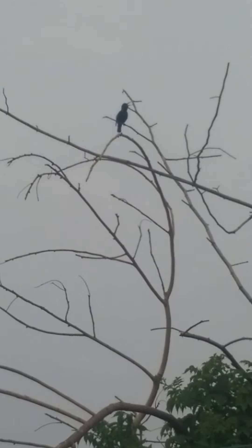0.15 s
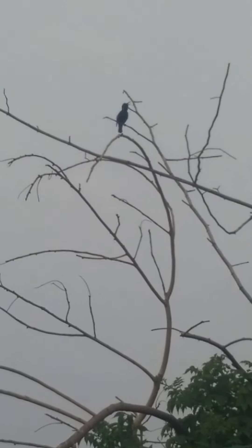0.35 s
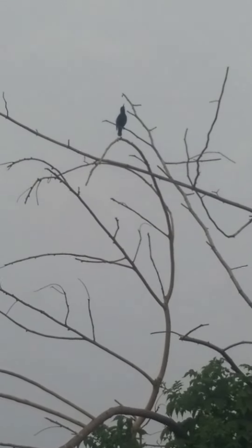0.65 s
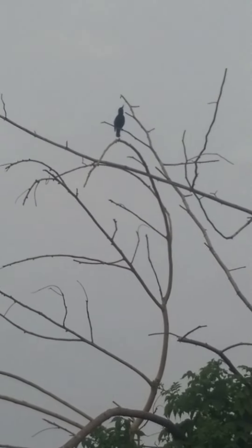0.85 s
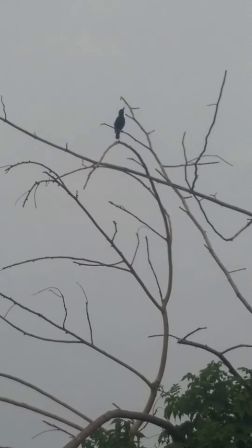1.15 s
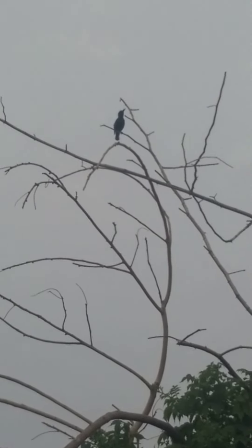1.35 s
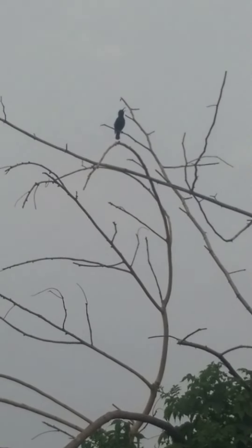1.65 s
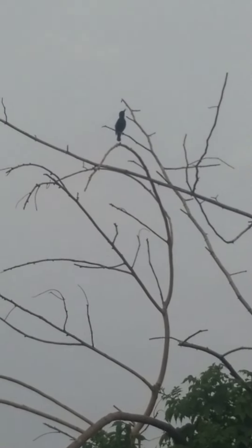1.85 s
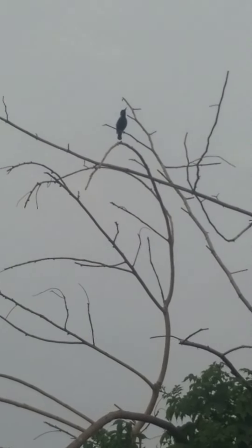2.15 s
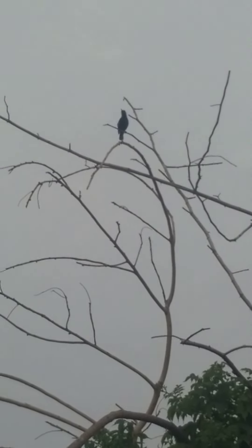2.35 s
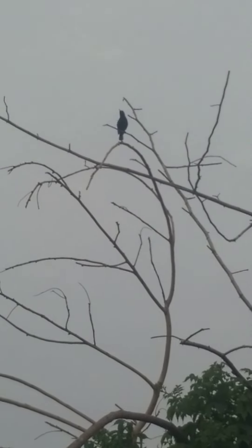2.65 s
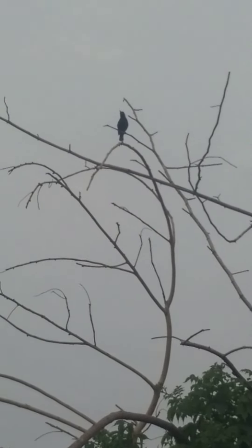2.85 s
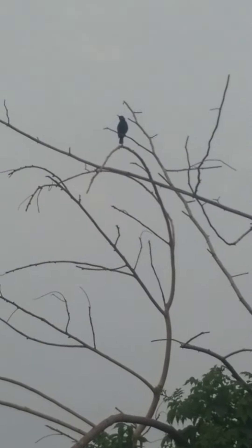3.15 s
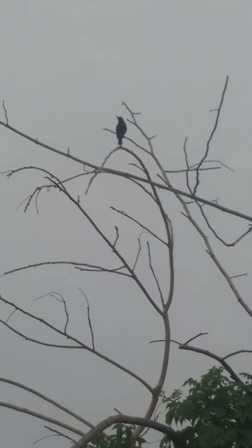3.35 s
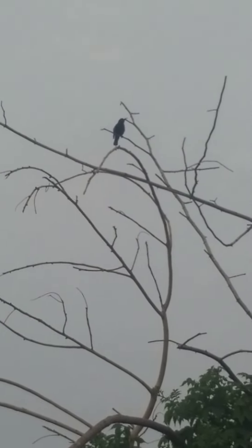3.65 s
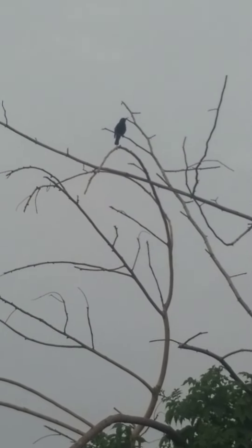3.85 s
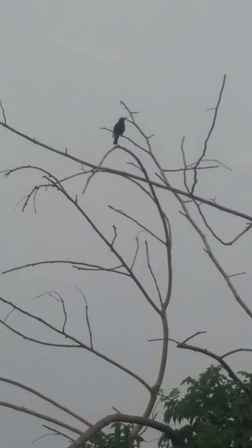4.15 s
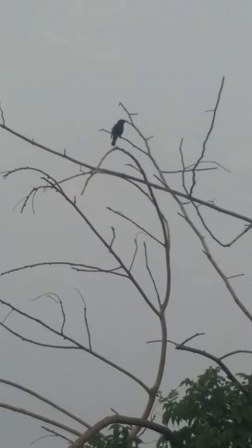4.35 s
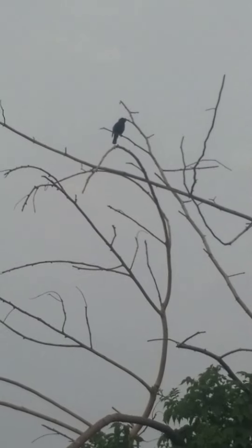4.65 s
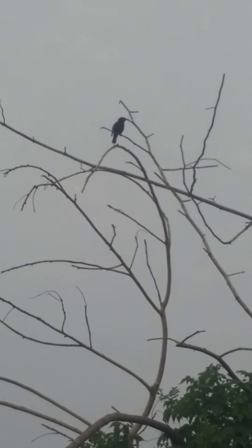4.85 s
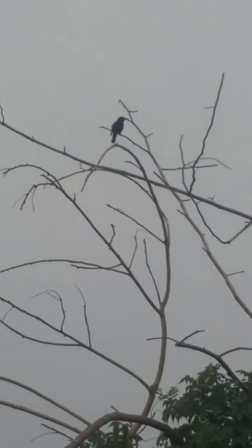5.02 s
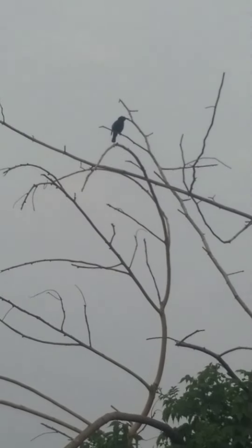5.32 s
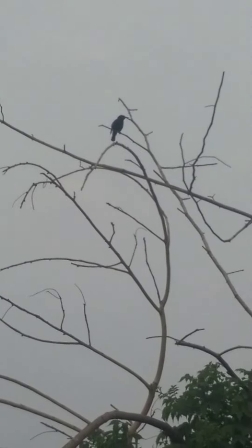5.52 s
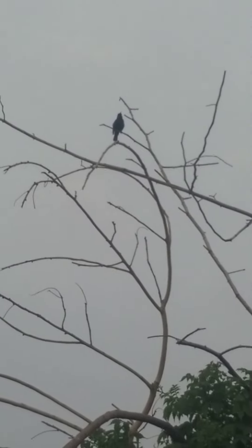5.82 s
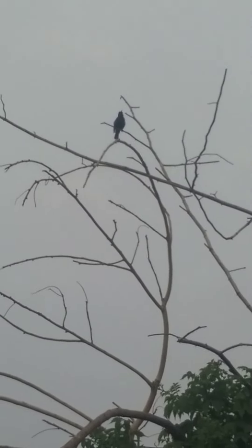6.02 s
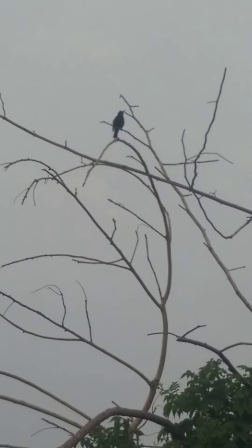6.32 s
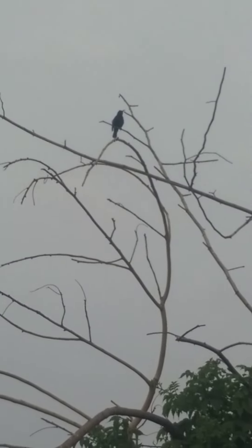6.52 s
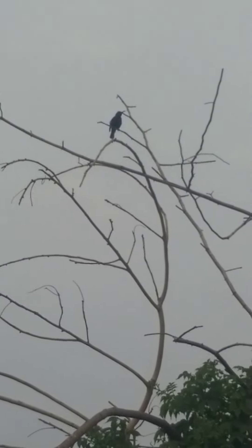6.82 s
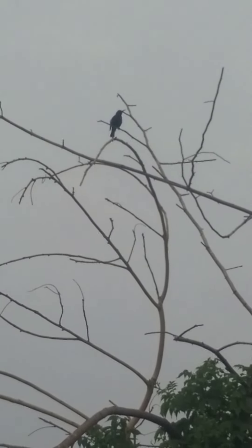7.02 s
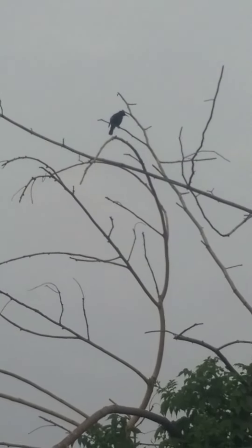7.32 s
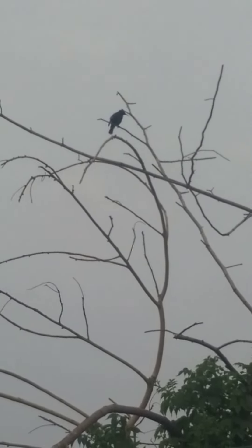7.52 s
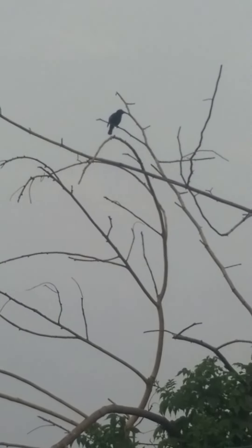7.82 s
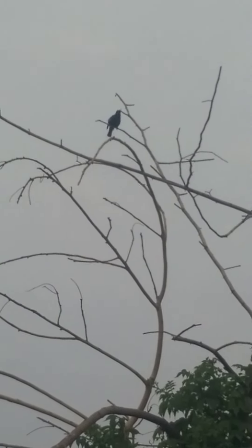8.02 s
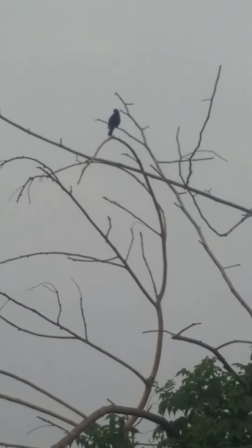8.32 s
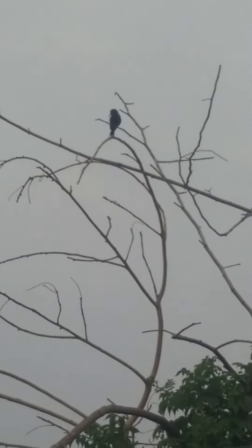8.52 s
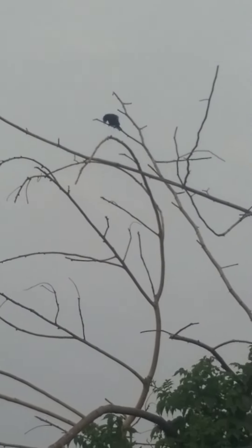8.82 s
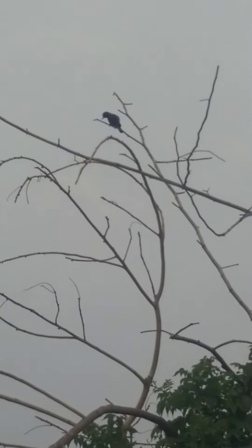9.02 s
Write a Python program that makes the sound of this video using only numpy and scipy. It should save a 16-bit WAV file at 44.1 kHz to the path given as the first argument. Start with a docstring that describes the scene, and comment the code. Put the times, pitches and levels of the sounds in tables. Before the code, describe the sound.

Outdoors, a small bird close by and to the right opens with two seconds of quick, piercing slurred whistles, its motifs speeding up. Falling calls, a dry rattle, harsh chips and faint twittering follow. A small dog farther off, near the middle, yaps at the start, around four seconds and around eight, echoing between houses. Low town murmur underlies it, with an engine rising at right near the end. Stereo pickup, open air.

```python
"""A sunbird, right of two ports, sings a run of slurred whistles, then calls, chatters and twitters softly.
Its syrinx is a swept near-sine with weak overtones; roughness adds flutter, hiss and a half-pitch tone.
A small dog nearly straight ahead yaps from further off, echoing between houses: harmonics through a throat.
Behind lie faint far birds (fluttering sines), an engine swelling at right (summed firing orders)
and the murmur of a town (coloured noise)."""
import sys
import numpy as np
from scipy import signal
from scipy.fft import rfft, irfft
from scipy.io import wavfile
from scipy.ndimage import uniform_filter1d, minimum_filter1d, map_coordinates

SR = 44100
rng = np.random.default_rng(int(sys.argv[2]) if len(sys.argv) > 2 else 0)


def wav_record(signal):
    """Record a signal, one row per channel, as 16-bit PCM in the file named by sys.argv[1]."""
    frames = np.transpose(np.atleast_2d(signal))
    bounded = np.clip(frames, -1, 1)
    # unit amplitude maps onto the largest positive 16-bit level
    quanta = np.round(bounded * 32767).astype(np.int16)
    wavfile.write(sys.argv[1], SR, quanta)


N = 404397
TIME_S = np.arange(N) / SR

# town murmur, relative colour: f/Hz, level/dB
TOWN_COLOUR = [(25, -22.5), (45, -6.5), (90, 0.5), (200, 1.5), (420, -3), (1100, -2.5), (1550, -4.5),
               (2100, -17), (3200, -12.5), (4500, -19.5), (5900, -12.5), (7000, -30), (10000, -32.5),
               (15500, -34.5)]
# town murmur, mean level: t/s, level/dB
TOWN_LEVEL = [(0, -45), (.8, -46.5), (2.0, -49.5), (2.6, -46), (4.5, -42.5), (5.8, -46.5), (7, -45),
              (9.17, -41.5)]
# engine: t/s, firing rate/Hz, level/dB (applied in full to orders from 5 up)
ENGINE = [(0, 45.34, -69), (3, 43.82, -57), (6, 44.23, -53), (7.6, 44.52, -52.5), (8.2, 43.52, -44.5),
          (8.8, 42.9, -44), (9.17, 43.95, -38.5)]
# engine orders: multiple of firing rate, gain/dB
ENGINE_ORDERS = [(2, -11), (4, -11), (5, -5.5), (6, -6.5), (8, -25), (10, -32), (11, -33.5)]
# far birds' held notes: start/s, length/s, mean f/Hz, level/dB, flutter/share of f
FAR_NOTES = [(1.924, 0.45, 2903, -53, 0.015), (2.154, 0.66, 2935, -63, 0.0088),
             (4.444, 0.3, 3674, -42, 0.075)]

# barks: start/s, length/s, first f/Hz, middle f/Hz, last f/Hz, level/dB, roughness, widest mouth/share of length
BARKS = [(0, 0.13, 729, 816, 864, -22, 0.76, 0.77), (0.408, .18, 667.6, 906, 773, -23.5, 1.57, .42),
         (1.1, 0.18, 615, 793.5, 751, -25, 0.52, 0.26), (3.983, 0.1272, 752, 799.1, 828, -17.5, 0.67, 0.66),
         (4.390, .18, 624.8, 800, 689.5, -20.5, 0.93, 0.26),
         (7.891, 0.14, 754, 809.3, 859.4, -18.5, 0.96, 0.72),
         (8.322, 0.14, 645.6, 849, 804, -16, 0.78, 0.4)]
# dog's throat, gain of the harmonics and colour of the noise: f/Hz, level/dB
THROAT = [(400, -50.5), (640, -9), (740, -2.5), (810, 3.5), (940, 1.5), (1100, -4), (1300, -2),
          (1550, -14.5), (1800, -15), (2050, -16.5), (2350, -31), (2900, -27.5), (7000, -58)]
BARK_ATTACK_S, BARK_RELEASE_S = 0.036, 0.02
BARK_MIDDLE_SHARE, BARK_EDGE_ROUGH = .56, 0.3  # when the middle pitch falls; roughness left with mouth shut
MOUTH_OPEN_S, MOUTH_SHUT_DB, MOUTH_WIDE_DB = .035, -2, 2  # time to 1/e of opening; gain of the overtones

# gain of a whistle's overtones where they fall: f/Hz, level/dB
OVERTONES = [(6000, -16), (9300, -49), (10600, -44.5), (13000, -32), (15000, -32.5)]
# song voice by pitch, full in mid range, weak at the edges: f/Hz, level/dB, roughness (0-1)
REGISTER = [(3300, -26.5, 0.8), (3900, -16.5, 0.51), (4490, -9, 0.16), (4850, -3.5, 0.06), (5450, -1, 0.2),
            (6360, -6.5, 0), (7070, -14.5, 0.2), (8000, -7.5, 0.2)]
WHISTLE_ATTACK_S, WHISTLE_RELEASE_S = 0.014, 0.0098
# song gesture, rise: share of length (0-1), f/Hz
RISE = [(0, 4930), (.3, 5695), (.7, 6220), (1, 6910)]
# song gesture, slur: share of length (0-1), f/Hz before pitch ratio
SLUR = [(0, 3220), (.22, 3820), (.43, 4550), (.62, 4746), (.78, 5046), (1, 4990)]
# song gesture, arch: share of length (0-1), f/Hz
ARCH = [(0, 4910), (.11, 7100), (.17, 7800), (.23, 4850), (.36, 6600), (.55, 6580), (1, 6000)]
# song gesture, hook: share of length (0-1), f/Hz
HOOK = [(0, 3300), (.25, 4100), (.5, 4900), (.75, 5600), (1, 5080)]
# song gesture, swoop: share of length (0-1), f/Hz before pitch ratio
SWOOP = [(0, 3447), (.23, 4230), (.42, 4545), (.55, 4900), (.62, 5330), (.68, 6700), (.79, 6145), (1, 5360)]
# opening phrases: rise start/s, rise length/s, rise level/dB, slur length/s, slur pitch ratio, slur level/dB
OPENING = [(.008, 0.049, -14, 0.14, 1.055, -13), (0.306, 0.034, -17, .115, 1, -13),
           (0.56, .040, -19.5, .105, .995, -12), (0.819, 0.039, -17, 0.12, 1.008, -11.5)]
LEAD_RASP_S, LEAD_RASP_RATIO, LEAD_RASP_DB = .042, 1.23, -37.5
# pairs of arch and hook: start/s, arch level/dB, hook level/dB
PAIRS = [(1.043, -11.5, -11), (1.236, -15.5, -14.5), (1.409, -14.5, -13)]
ARCH_S, HOOK_S, HOOK_AFTER_S = .062, .06, 0.064
# closing swoops: start/s, pitch ratio
SWOOPS = [(1.591, 1.024), (1.754, 1.03), (1.909, 1), (2.064, .99), (2.215, 0.99)]
SWOOP_S, SWOOP_DB = .108, -13

# "tew" shape: share of length (0-1), f/Hz before pitch ratio, level/dB, roughness before its ratio
TEW = [(0, 5950, -20.5, .2), (.13, 5270, -8.5, 0.3), (.3, 4130, -15.5, 0.1), (.45, 3938, -0.5, 0.15),
       (.65, 3810, -5.5, 0.12), (.83, 3825, 1.5, .06), (1, 3807, -8, 0.2)]
# chip shape: share of length (0-1), f/Hz before pitch ratio, level/dB, roughness before its ratio
CHIP = [(0, 3212, -24.5, 0.88), (.3, 3900, -12, 0.83), (.48, 4330, -8.5, 0.66), (.62, 3844, -4, 0.63),
        (.85, 3286, -6.5, 0.18), (1, 2495, -19.5, .35)]
# buzz shape: share of length (0-1), f/Hz, level/dB, roughness before its ratio
BUZZ = [(0, 5330, 4, .6), (.25, 5600, -7, .5), (.6, 5380, 3.5, .7), (1, 4870, -3.5, 0.96)]
# falling "tew" whistles: start/s, length/s, pitch ratio, level/dB, roughness ratio
TEWS = [(1.88, .112, 1.045, -19, 2.35), (2.899, .134, 1.003, -14.5, 0.93)]
# chips, buzz from the other side of the syrinx: start/s, length/s, pitch ratio, level/dB, buzz level/dB,
# roughness ratio
CHIPS = [(.264, .071, 1, -23.5, -28, 0.64), (0.407, .07, 1, -22.5, -34, 1.2),
         (4.089, 0.076, 1, -27.5, -39, 1.23), (4.244, 0.07, 1.11, -26, -37, 1.2),
         (5.243, .06, 1.04, -40.5, -46.5, 1.4), (5.409, 0.052, 1.16, -34, -54, 2.4),
         (6.205, 0.069, 1.015, -16.5, -30.5, 1.23), (6.341, .073, 1.08, -15, -20.5, 1.23),
         (6.57, 0.087, 1, -26.5, -37, 1.45), (6.726, .07, 1.06, -26.5, -35, 1.6),
         (7.33, 0.091, 0.93, -38.5, -63, 1.6), (7.831, 0.065, 1.013, -18, -35, 1.23)]
BUZZ_AFTER_S, BUZZ_SHARE = 0.001012, .65

# single rasps: centre/s, length/s, level/dB
RASPS = [(5.134, 0.055, -32.5), (6.67, 0.035, -32.5), (6.799, 0.047, -30), (8.061, 0.036, -37),
         (8.099, 0.049, -34), (8.166, 0.034, -29.5)]
# colour of rasps (before pitch ratio), snaps and hiss: f/Hz, level/dB
RASP_COLOUR = [(1500, -41.5), (2500, -18), (3400, -4.5), (4300, -7.5), (5200, 6.5), (6200, -2.5),
               (7500, -19.5), (10500, -29.5), (12000, -36.5), (15000, -57)]
# bill snaps: start/s, level/dB before decay
SNAPS = [(8.997, -16), (9.005, -23)]
# chatter: per-note growth of the gap (ratio), length and level
CHATTER_START_S, CHATTER_GAP_S, CHATTER_SLOWING = 3.134, .0445, 1.085
CHATTER_NOTE_S, CHATTER_LONGER_S = .028, 0.0018
CHATTER_DB, CHATTER_SWELL_DB, CHATTER_RATIO = -39.5, 1.4, 0.9

# soft gliding twitters: start/s, length/s, from f/Hz, to f/Hz, level/dB
TWITTERS = [(3.641, .085, 3030, 2560, -55.5), (3.871, 0.041, 4580, 6540, -49.5),
            (3.881, .03, 3800, 3300, -46), (4.923, 0.049, 4820, 6320, -49), (4.975, 0.035, 4600, 3350, -53),
            (5.359, 0.083, 2490, 1850, -51.5), (5.622, 0.042, 4130, 5600, -43),
            (6.04, .09, 3360, 2760, -51.5), (6.490, 0.099, 3740, 2760, -45.5),
            (6.887, 0.059, 3830, 2700, -47), (7.02, 0.02, 4700, 6200, -49),
            (7.021, 0.079, 4670, 3900, -40.5), (7.164, .072, 2990, 2660, -46),
            (7.465, 0.044, 4100, 4260, -41), (7.636, .085, 2740, 3240, -50),
            (7.724, 0.065, 6120, 6550, -57.5), (8.304, 0.066, 4600, 5760, -44.5),
            (8.631, 0.024, 5100, 5760, -49), (8.952, 0.032, 4850, 6150, -48)]
TWITTER_ROUGH, TWITTER_BOW = 0.071, 0.03  # roughness (0-1); rise of mid glide, share of pitch
# soft nasal notes: start/s, length/s, fundamental f/Hz, end pitch ratio, level/dB
NASAL_NOTES = [(4.943, 0.023, 1280, 0.98, -46), (4.977, 0.033, 1330, 0.93, -44),
               (5.156, 0.056, 1320, 0.9, -43.5)]


def undb(db):
    """Decibels to gain."""
    return 10 ** (np.asarray(db) / 20)


def unit(x):
    """Scale to rms 1."""
    return x / np.sqrt(np.mean(x ** 2))


def curves(rows, at):
    """Each column of a table, joined by straight lines."""
    knots, *columns = np.transpose(rows)
    return [np.interp(at, knots, c) for c in columns]


def response(points, hz):
    """Gain of a (f/Hz, level/dB) spectrum, interpolated over log frequency."""
    knots_hz, db = np.transpose(points)
    return undb(np.interp(np.log(hz + 1), np.log(knots_hz), db))


def noise(points, size):
    """Noise of a given colour, rms 1."""
    spectrum = rfft(rng.standard_normal(size))
    return unit(irfft(spectrum * response(points, np.fft.rfftfreq(size, 1 / SR)), size))


def wander(rate_hz, size):
    """Smooth random curve of spread near 1, through rate_hz random knots a second."""
    at = np.arange(size) * rate_hz / SR
    return map_coordinates(rng.standard_normal(int(at[-1]) + 3), [at], order=2, mode="nearest")


def phase_of(hz):
    """Phase in radians: the running integral of frequency."""
    return 2 * np.pi * np.cumsum(hz) / SR


def fade(size):
    """Soft start and end of a note, 2.5 ms each unless it is shorter than 5 ms."""
    return signal.windows.tukey(size, min(1, .005 * SR / size))


def add(track, start_s, sound):
    """Mix a sound into a track at a time."""
    i = max(0, int(start_s * SR))
    track[i:i + len(sound)] += sound[:N - i]


def outdoors(x, near_db, near_s, tail_db, t60_s, right_db, spread, lag_samples):
    """Direct sound, eight close reflections and a long decaying scatter at two ports; the left one lags."""
    t = np.arange(int(1.2 * SR)) / SR
    near = np.zeros(len(t))
    delays_s = near_s * (np.arange(8) + rng.random(8) + 1) / 8
    near[(delays_s * SR).astype(int)] = rng.choice([-1, 1], size=8) * np.exp(-delays_s / near_s)
    front = undb(near_db) * near / np.linalg.norm(near)
    front[0] = 1  # direct sound
    decay = np.exp(-np.log(1000) * t / t60_s) * np.minimum(t / near_s, 1)
    scatter = rng.standard_normal((3, len(t))) * decay
    scatter *= undb(tail_db) / np.linalg.norm(scatter, axis=1, keepdims=True)
    # one scatter shared by the ports, one for each port alone
    paths = front + np.sqrt(1 - spread) * scatter[2] + np.sqrt(spread) * scatter[:2]
    paths /= np.linalg.norm(paths, axis=1, keepdims=True)
    left, right = signal.fftconvolve(x[None], paths, axes=1)[:, :N]
    left = np.pad(left, (lag_samples, 0))[:N]
    return np.array([left * undb(-right_db / 2), right * undb(right_db / 2)])


def town(width_hz=3200, bass_width_hz=60, right_db=1.1, flicker_db=-0.86):
    """Coloured noise murmur, nearly alike at both ports save in the treble and deepest rumble."""
    hz = np.fft.rfftfreq(N, 1 / SR)
    apart = np.clip(hz / width_hz + bass_width_hz / (hz + 1), 0, 1)
    mid = noise(TOWN_COLOUR, N)
    side = irfft(rfft(noise(TOWN_COLOUR, N)) * apart, N)
    db, = curves(TOWN_LEVEL, TIME_S)
    ports = np.array([(mid + side) * undb(-right_db / 2), (mid - side) * undb(right_db / 2)])
    return ports * undb(db + flicker_db * wander(7.4, N))


def engine(waver_db=2, steady_db=-52):
    """Sine orders of an approaching engine; the deep ones carry from afar, so mostly the higher ones swell."""
    hz, db = curves(ENGINE, TIME_S)
    phase = phase_of(hz * (1 + .004 * wander(5, N)))
    hum = 0
    for k, gain_db in ENGINE_ORDERS:
        swell = min(1, (k / 5) ** 2)
        order_db = gain_db + swell * db + (1 - swell) * steady_db + waver_db * wander(4, N)
        hum = hum + undb(order_db) * np.sin(k * phase + 2 * np.pi * rng.random())
    return np.sqrt(2) * hum


def far_birds():
    """Thin held whistles and a buzzy trill: sines of fluttering pitch that swell and fade."""
    track = np.zeros(N)
    for start_s, length_s, hz, db, flutter in FAR_NOTES:
        size = int(length_s * SR)
        phase = phase_of(hz * (1 + flutter * wander(760, size)))
        add(track, start_s, undb(db) * unit(np.sin(phase) * signal.windows.cosine(size)))
    return track


def dog(split_db=-3, rasp_db=-9):
    """Yaps: throat-shaped harmonics; roughness, most with a wide mouth, adds thirds of the pitch and noise."""
    track = np.zeros(N)
    for start_s, length_s, first_hz, middle_hz, last_hz, level_db, roughness, widest in BARKS:
        size = int(length_s * SR)
        t = np.arange(size) / SR
        hz, = curves([(0, first_hz), (BARK_MIDDLE_SHARE, middle_hz), (1, last_hz)], t / length_s)
        mouth = np.exp(-((t - widest * length_s) / MOUTH_OPEN_S) ** 2)
        rough = roughness * (BARK_EDGE_ROUGH + (1 - BARK_EDGE_ROUGH) * mouth)
        bright_db = MOUTH_SHUT_DB + (MOUTH_WIDE_DB - MOUTH_SHUT_DB) * mouth
        hz = hz * (1 + .055 * rough * wander(120, size))
        phase = phase_of(hz)
        voice = undb(rasp_db) * rough * noise(THROAT, size)
        for k in np.arange(2, 13) / 3:
            if k % 1 == 0:
                strength = 1
            else:
                strength = undb(split_db) * rough * (1 + 0.57 * wander(67.0, size))
            strength = strength * undb(bright_db * np.clip(k - 1, 0, 1))
            voice += strength * response(THROAT, k * hz) * np.sin(k * phase + 2 * np.pi * rng.random())
        attack = np.minimum(t / BARK_ATTACK_S, 1)
        release = np.minimum((length_s - t) / BARK_RELEASE_S, 1)
        add(track, start_s, undb(level_db) * unit(voice * attack * release))
    return track


def wall_echo(x, delay_s=0.06, echo_db=-21):
    """A house front some ten metres off repeats each syllable faintly."""
    return x + undb(echo_db) * np.pad(x, (int(delay_s * SR), 0))[:N]


def syrinx(hz, db, rough, flutter=.06, waver=0.0065, uneven_db=2, half_db=-17, hiss_db=-13):
    """A nearly pure, randomly uneven whistle; roughness makes it flutter, hiss and double its period."""
    size = len(hz)
    hz = uniform_filter1d(hz, size=150)
    hz = hz * (1 + waver * wander(242.1, size) + flutter * rough * wander(1283, size))
    phase = phase_of(hz)
    overtones = sum(response(OVERTONES, k * hz) * np.sin(k * phase) for k in (2, 3))
    half_tone = undb(half_db) * rough ** 2 * np.sin(phase / 2)
    tone = np.sin(phase) + overtones + half_tone
    hiss = undb(hiss_db) * rough * noise(RASP_COLOUR, size)
    effort = undb(db + uneven_db * wander(102.8, size)) * fade(size)
    return effort * (np.sqrt(2) * tone * (1 + 0.24 * rough * wander(900, size)) + hiss)


def twitter(length_s, from_hz, to_hz, db):
    """A soft, slightly arched glide that swells and fades."""
    size = int(length_s * SR)
    arch = signal.windows.cosine(size)
    hz = np.geomspace(from_hz, to_hz, size) * (1 + TWITTER_BOW * arch)
    return syrinx(hz, db, TWITTER_ROUGH) * np.sqrt(arch)


def subsong(count=50, begin_s=3.0, level_db=-56, scatter_db=5, low_hz=3000, high_hz=6400, glide_octaves=0.16):
    """Soft undervoice: set twitters, random short glides up and down, and nasal stacks of harmonics."""
    track = np.zeros(N)
    for start_s, length_s, from_hz, to_hz, db in TWITTERS:
        add(track, start_s, twitter(length_s, from_hz, to_hz, db))
    for i, (when, span, pitch, slope, loud) in enumerate(rng.random((count, 5))):
        hz = low_hz + (high_hz - low_hz) * pitch
        glide = 2 ** (glide_octaves * (slope - .5))
        start_s = begin_s + (TIME_S[-1] - begin_s) * (i + when) / count
        note = twitter(0.021 + 0.027 * span, hz / glide, hz * glide, level_db + scatter_db * loud)
        add(track, start_s, note)
    for start_s, length_s, hz, end_ratio, db in NASAL_NOTES:
        size = int(length_s * SR)
        phase = phase_of(hz * np.linspace(1, end_ratio, size))
        stack = sum(np.sin(k * phase) / np.sqrt(k) for k in range(2, 7))  # no fundamental
        add(track, start_s, undb(db) * unit(stack) * fade(size))
    return track


def rasp(length_s, db, ratio, rattle_hz=330, rattle_depth=0.96):
    """A dry, toneless note: coloured noise with a fast, irregular rattle."""
    size = int(length_s * SR)
    rattle_phase = phase_of(rattle_hz * (1 + 0.24 * wander(223, size)))
    rattle = 1 + rattle_depth * np.sin(rattle_phase)
    colour = [(hz * ratio, gain_db) for hz, gain_db in RASP_COLOUR]
    return undb(db) * noise(colour, size) * rattle * signal.windows.cosine(size)


def chatter(count=7, snap_s=0.0016):
    """A run of rasps that slows, lengthens and swells; single rasps; bill snaps as decaying noise."""
    track = np.zeros(N)
    centre_s = CHATTER_START_S
    for k in range(count):
        length_s = CHATTER_NOTE_S + k * CHATTER_LONGER_S
        note = rasp(length_s, CHATTER_DB + k * CHATTER_SWELL_DB, CHATTER_RATIO)
        add(track, centre_s - length_s / 2, note)
        centre_s += CHATTER_GAP_S * CHATTER_SLOWING ** k
    for centre_s, length_s, db in RASPS:
        add(track, centre_s - length_s / 2, rasp(length_s, db, CHATTER_RATIO))
    t = np.arange(1024) / SR
    for start_s, db in SNAPS:
        add(track, start_s, undb(db) * noise(RASP_COLOUR, len(t)) * np.exp(-t / snap_s))
    return track


def call(shape, length_s, db, ratio=1, roughness=1):
    """A call note with its own course of pitch, effort and roughness."""
    hz, effort_db, rough = curves(shape, np.linspace(0, 1, int(length_s * SR)))
    return syrinx(ratio * hz, db + effort_db, roughness * rough)


def calls():
    """Falling whistles, and harsh chips voiced by both sides of the syrinx."""
    track = np.zeros(N)
    for start_s, length_s, ratio, db, roughness in TEWS:
        add(track, start_s, call(TEW, length_s, db, ratio, roughness))
    for start_s, length_s, ratio, db, buzz_db, roughness in CHIPS:
        add(track, start_s, call(CHIP, length_s, db, ratio, roughness))
        buzz = call(BUZZ, BUZZ_SHARE * length_s, buzz_db, roughness=roughness)
        add(track, start_s + BUZZ_AFTER_S, buzz)
    return track


def whistle(gesture, length_s, db, ratio=1):
    """A song syllable: loudness and roughness follow the pitch through the register."""
    t = np.arange(int(length_s * SR)) / SR
    hz = ratio * curves(gesture, t / length_s)[0]
    carry_db, rough = curves(REGISTER, hz)
    attack = np.minimum(t / WHISTLE_ATTACK_S, 1)
    release = np.minimum((length_s - t) / WHISTLE_RELEASE_S, 1)
    return syrinx(hz, db + carry_db, rough) * attack * release


def song():
    """Three repeated motifs, each quicker than the last: rise and slur, arch and hook, swoop."""
    track = np.zeros(N)
    for start_s, rise_s, rise_db, slur_s, ratio, slur_db in OPENING:
        if start_s > LEAD_RASP_S:  # room for a rasp ahead of the rise
            add(track, start_s - LEAD_RASP_S, rasp(LEAD_RASP_S, LEAD_RASP_DB, LEAD_RASP_RATIO))
        add(track, start_s, whistle(RISE, rise_s, rise_db))
        add(track, start_s + rise_s, whistle(SLUR, slur_s, slur_db, ratio))
    for start_s, arch_db, hook_db in PAIRS:
        add(track, start_s, whistle(ARCH, ARCH_S, arch_db))
        add(track, start_s + HOOK_AFTER_S, whistle(HOOK, HOOK_S, hook_db))
    for start_s, ratio in SWOOPS:
        add(track, start_s, whistle(SWOOP, SWOOP_S, SWOOP_DB, ratio))
    return track


def sunbird():
    """Everything the near bird utters."""
    return song() + calls() + chatter() + subsong()


def scene(engine_right_db=4):
    """Bird: direct sound and close reflections; dog and far birds: largely echo; engine: to the right."""
    engine_gains = undb(np.array([[-engine_right_db], [engine_right_db]]) / 2)
    others = outdoors(far_birds(), near_db=-28, near_s=0.12, tail_db=6.0, t60_s=0.66,
                      right_db=6.0, spread=0.6, lag_samples=0)
    barks = outdoors(dog(), near_db=-2, near_s=.06, tail_db=-1, t60_s=1.0,
                     right_db=1.96, spread=0.02, lag_samples=1)
    bird = outdoors(wall_echo(sunbird()), near_db=3.5, near_s=.013, tail_db=-7.0, t60_s=0.47,
                    right_db=5.5, spread=0.68, lag_samples=14)
    return town() + engine() * engine_gains + others + barks + bird


def record(dry, bass_hz=40, top_hz=15600, ceiling=.8):
    """Cut the deepest bass, ease the gain down around peaks over the ceiling, cut the top."""
    thin = signal.sosfilt(signal.butter(4, bass_hz, "high", fs=SR, output="sos"), dry)
    allowed = ceiling / np.maximum(np.abs(thin).max(axis=0), ceiling)
    gain = uniform_filter1d(minimum_filter1d(allowed, size=400), size=400)
    return signal.sosfilt(signal.ellip(10, .2, 80, top_hz, fs=SR, output="sos"), thin * gain)


dry = scene()
out = record(dry)
wav_record(out)
```